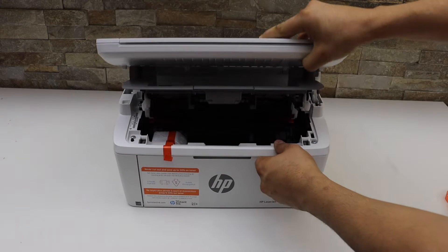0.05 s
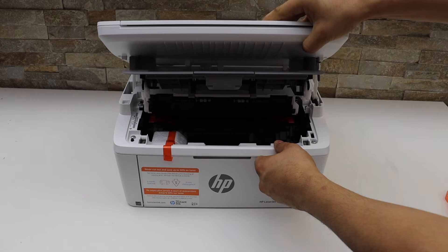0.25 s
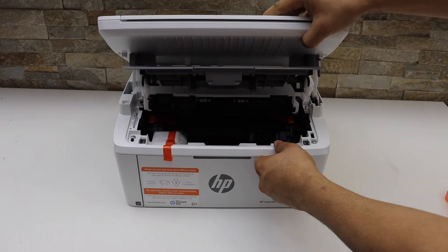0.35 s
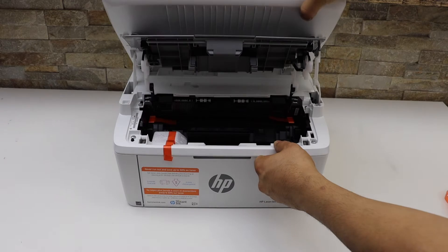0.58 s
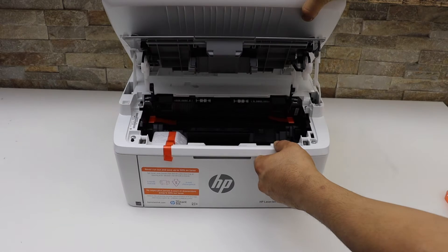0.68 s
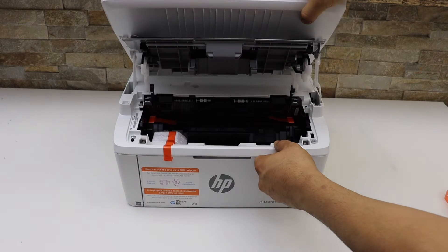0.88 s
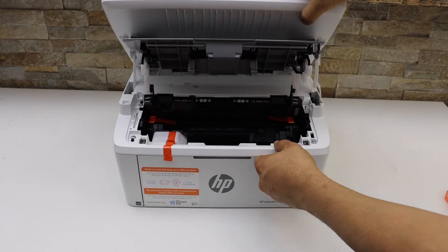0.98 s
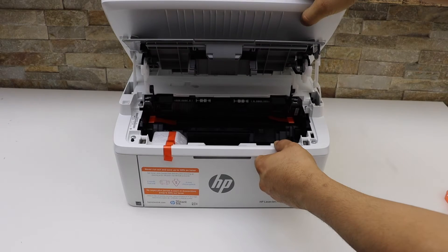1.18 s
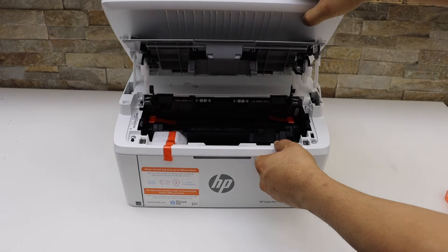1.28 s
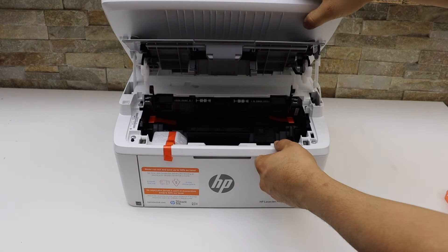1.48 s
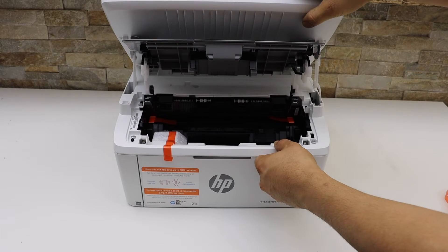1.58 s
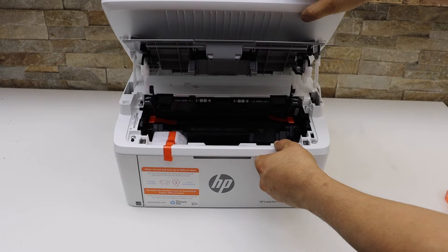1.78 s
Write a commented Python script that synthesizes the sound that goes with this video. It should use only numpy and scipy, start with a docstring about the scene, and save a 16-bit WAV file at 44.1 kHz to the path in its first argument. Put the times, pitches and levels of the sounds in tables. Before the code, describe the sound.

A small printer's plastic lid clacks as a hand lifts it. The latch snaps free, the hinge clacks over, and the lid hits its stop with a brief scrape and thump. Faint ticks follow, close by in a quiet room.

```python
"""The plastic lid of a small printer clacks as a hand lifts it in a quiet room.
The latch snaps free and rebounds, the hinge link clacks over, and the lid hits its stop, scrapes and
settles with a thump. Each impact excites a dense burst of panel modes and a few clear, damped ones.
Sliding plastic rasps by stick-slip friction; the walls add a short reverberation over steady air."""
import sys
import numpy as np
from scipy import signal
from scipy.fft import rfft, irfft, next_fast_len
from scipy.io import wavfile
from scipy.ndimage import uniform_filter1d, map_coordinates

SR = 44100
rng = np.random.default_rng(int(sys.argv[2]) if len(sys.argv) > 2 else 0)


def put_to_file(sound):
    """Save the sound as 16-bit audio at rate SR, in the file named by the first command-line argument."""
    columns = np.atleast_2d(sound).T  # one column per channel
    safe = np.clip(columns, -1, 1)
    whole_steps = np.round(safe * 32767)
    wavfile.write(sys.argv[1], SR, whole_steps.astype(np.int16))


N = 81585

# impacts of lid and hinge: t/s, rise/s, T60/s, lowest f/Hz, level/dB at each of CLACK_HZ
CLACKS = [(0.0, 0.00092, 0.034, 140, -41.5, -38.5, -35, -39),
          (0.2225, 0.0028, 0.022, 149, -37, -30, -14.5, -10.5),
          (0.225, 0.00032, 0.059, 210, -22.5, -17.5, -11, -30),
          (.262, 0.0041, 0.043, 298, -24, -20, -17, -25.5),
          (0.2714, 0.00088, 0.022, 297, -32, -20, -20.5, -18),
          (0.4394, .0006, 0.012, 150, -36.5, -25.5, -15.5, -10.5),
          (0.4414, 0.0018, 0.05, 162, -27.5, -18.5, -15, -18),
          (.557, 0.0056, 0.087, 136, -30, -22.5, -18.5, -22.5),
          (.637, 0.00031, 0.015, 136.8, -25.5, -16.5, -13.5, -13),
          (0.6392, 0.0013, .055, 140, -24.5, -17.5, -16.5, -21),
          (0.725, 0.00081, 0.021, 201, -39.5, -26.5, -40, -42),
          (0.738, 0.00096, 0.041, 185, -30.5, -34, -30.5, -30)]
# ticks of loose plastic: t/s, T60/s, level/dB at each of TICK_HZ
TICKS = [(.027, .03, -59, -62, -48), (.079, 0.11, -40, -60, -56), (.193, 0.16, -50, -51.5, -48.5),
         (0.8438, 0.024, -59, -59, -34), (.888, 0.079, -55, -44, -70), (.932, 0.058, -65, -48.5, -60.5),
         (1.105, 0.076, -46, -64, -71), (1.214, 0.033, -63, -47.5, -46.5)]
# resonances of the loose plastic: f/Hz, level/dB
TICK_PEAKS = [(1150, -4.5), (2000, -7.5), (3000, -4.5), (3800, 0), (6000, -9)]
# panel response common to all impacts: f/Hz, gain/dB
PANEL = [(60, -11.5), (170, -6), (330, 1), (600, 1), (850, 0.5), (1100, 1), (2000, 0.5), (3000, -3.5),
         (3600, -4), (4300, -2.5), (5800, -4), (7500, -2), (9000, -3.5), (10700, -1.5), (12300, -8),
         (13500, -4.5), (15500, -17.5)]
# normal modes of each struck part: f/Hz, level/dB, T60/s
LATCH_MODES = [(242, -31, .12), (305, -23, .16), (350, -24, .1), (470, -21, .07), (517, -14, .075),
               (567, -15, .06), (860, -27, .08), (1055, -18, .075), (1290, -22, .06), (1830, -25, .1),
               (1955, -12.5, .055), (2120, -20, .04), (2405, -19, .07), (2555, -23, .06), (3650, -22, .035)]
REBOUND_MODES = [(295, -24, .16), (620, -24, .08), (1225, -20, .09), (1615, -24, .08)]
LINK_MODES = [(165, -32, .15), (220, -34, .1), (435, -26, .08), (710, -23, .05), (1062, -12, .055),
              (1315, -18, .07), (3600, -23, .03), (5185, -22, .035), (7040, -22, .04)]
HINGE_MODES = [(160, -30, .17), (315, -27, .13), (402, -23, .13), (597, -27, .11), (1480, -28, .07),
               (11200, -28, .03)]
STOP_MODES = [(190, -29, .1), (318, -27, .22), (365, -18, .09), (398, -19, .1), (690, -15, .06),
              (1010, -17, .055), (1105, -20, .08), (1525, -17, .06), (2245, -23, .055), (2720, -22, .04)]
LID_MODES = [(62, -39, .3), (88, -26, .14), (180, -27, .22), (241, -32, .35), (399, -29, .35)]
STAY_MODES = [(175, -28, .14), (1320, -34, .2), (1588, -37, .2), (1890, -28, .16)]
CATCH_MODES = [(9000, -35, .006), (12800, -28, .008), (13700, -24, .012)]
# envelopes of the sliding hinge and the rubbing lid: t/s, level/dB
SLIDE_ENVELOPE = [(.655, -33.5), (.673, -21), (.686, -17.5), (.70, -26.5), (.73, -31.5), (.78, -62)]
RUB_ENVELOPE = [(0, -31.5), (.06, -43.5), (.12, -43), (.2, -49), (.55, -56), (.8, -60.5), (.95, -57)]
# their friction spectra: f/Hz, relative band level/dB
SLIDE_SPECTRUM = [(40, -26), (90, -9.5), (200, -7), (600, -9.5), (1400, -1.5), (3000, -1.5), (8000, 2.5),
                  (11000, 0.5), (15500, -24)]
RUB_SPECTRUM = [(50, -26), (100, -14), (170, 2.5), (280, -13), (400, -6), (1200, -0.5), (4000, -5.5),
                (12000, -6.5), (15500, -22.5)]
# reverberation of the room: f/Hz, tail energy/dB, T60/s
ROOM = [(60, -8.5, .4), (180, -2.5, 0.34), (400, -2.5, 0.39), (1200, -6.5, 0.42), (3000, -10, 0.43),
        (7000, -11.5, 0.33), (13780, -17, .27)]
# steady air of the room: f/Hz, band level/dB
AIR_SPECTRUM = [(25, -72), (60, -69), (90, -70), (125, -57.5), (250, -57.5), (600, -57.5), (1200, -60),
                (2500, -64.5), (5000, -68), (8000, -72.5), (12000, -69.5), (15500, -89)]
# when each part is struck: t/s, modes
PARTS = [(.225, LATCH_MODES), (.266, REBOUND_MODES), (.441, LINK_MODES), (.563, HINGE_MODES),
         (.6372, STOP_MODES), (.68, LID_MODES), (.732, STAY_MODES), (.69, CATCH_MODES)]

CLACK_HZ, TICK_HZ = (400, 1400, 4000, 10000), (300, 1990, 11970)
TICK_RISE_S, TICK_LOWEST_HZ = .0006, 118
BANDS_HZ = 31.25 * 2 ** (np.arange(19) / 2)
PLUS_MINUS = np.array([[1], [-1]])


def lid_impacts(resonance):
    """Impact excitation: parts clack and tick; resonance (0-1) sets how much their modes colour it."""
    out = np.zeros((2, N))
    for start, rise, t60, lowest_hz, *levels in CLACKS:
        _, modes = min(PARTS, key=lambda part: abs(part[0] - start))
        spectrum = list(zip(CLACK_HZ, levels))
        add(out, start, panel_burst(rise, t60, lowest_hz, spectrum, modes, resonance))
    for start, t60, *levels in TICKS:
        spectrum = list(zip(TICK_HZ, levels))
        add(out, start, panel_burst(TICK_RISE_S, t60, TICK_LOWEST_HZ, spectrum, TICK_PEAKS, resonance))
    return out


def panel_burst(rise_s, t60, lowest_hz, spectrum, modes, resonance,
                hold_s=.0024, smooth_hz=150, shelf_db=-12.5, size=8192):
    """Modal overlap: crowded panel modes merge into decaying noise, weak below the lowest mode."""
    t = np.arange(size) / SR
    hz = np.maximum(np.arange(size // 2 + 1) * SR / size, BANDS_HZ[0])
    envelope = np.minimum(t / rise_s, 1) * fade(t - rise_s - hold_s, t60)
    burst = rfft(envelope * rng.standard_normal((2, size)))
    power = uniform_filter1d(abs(burst) ** 2, int(smooth_hz * size / SR), axis=1)
    ripple = np.sqrt(power / np.sum(envelope ** 2))  # chance peaks of the noise, divided out below
    bass_db = shelf_db / (1 + (hz / lowest_hz) ** 8)
    gain = undb(at(hz, PANEL) + at(hz, spectrum) + bass_db + resonance * resonance_db(hz, modes))
    gain *= np.sqrt(SR / (np.maximum(hz, lowest_hz) * np.log(2)))  # octave level to spectral density
    width = np.sqrt((1 + PLUS_MINUS * direct_coherence(hz)) / 2)
    mid, side = irfft(burst * minimum_phase(gain * width / ripple))
    return np.array([mid + side, mid - side])


def resonance_db(hz, modes, peak_db=10.5, valley_db=-4.5, valley_top_hz=4500):
    """Resonance: the response peaks around a part's main modes and sinks between them."""
    centre_hz, db = np.array(modes, float).T[:2, :, None]
    width_hz = 45 + .03 * centre_hz
    peaks = undb((db - db.max()) / 2) / (1 + ((hz - centre_hz) / width_hz) ** 4)
    return peak_db * peaks.max(axis=0) + valley_db / (1 + (hz / valley_top_hz) ** 2)


def ringing_parts(gain_db=-1):
    """Free vibration: each struck part rings as a sum of exponentially damped normal modes."""
    out, t = np.zeros((2, N)), np.arange(N) / SR
    for start, modes in PARTS:
        for hz, db, t60 in modes:
            # higher modes reach the two channels further out of phase
            skew = rng.choice([-1, 1]) * np.arccos(direct_coherence(hz)) / 2
            phase = rng.uniform(0, 2 * np.pi) + PLUS_MINUS * skew
            onset = np.sin(np.pi / 2 * np.minimum(t * hz / 2, 1))  # two cycles long
            envelope = undb(db + gain_db) * onset * fade(t, t60)
            add(out, start, envelope * np.sin(2 * np.pi * hz * t + phase))
    return out


def friction(envelope, spectrum, slips_per_s=1200, slip_s=.002, spread_db=3):
    """Stick-slip friction: sliding plastic releases energy in tiny, uneven bursts of noise."""
    t = np.arange(N) / SR
    slips = (rng.random(N) < slips_per_s / SR) * undb(spread_db * rng.standard_normal(N))
    slip_energy = signal.lfilter([1], [1, -np.exp(-1 / (slip_s * SR))], slips ** 2)
    rasp = np.sqrt(slip_energy) * steady_noise(spectrum, direct_coherence)
    times, db = np.array(envelope).T
    return rasp / rasp.std() * undb(np.interp(t, times, db, left=-np.inf, right=-np.inf))


def reverberation(sound, delay_s=.0088, build_s=.017, wide_hz=810, size=32768):
    """Diffuse field: wall reflections build up and decay by band, coherent only in the bass."""
    t, response = np.arange(size) / SR, 0
    for hz in BANDS_HZ:
        envelope = np.clip((t - delay_s) / build_s, 0, 1) * fade(t, at(hz, ROOM, column=2))
        tail = envelope * band_noise(hz, 1 / (1 + (hz / wide_hz) ** 2), size)
        band_share = hz * np.log(2) / SR
        response += tail * np.sqrt(2 * band_share / np.sum(tail ** 2)) * undb(at(hz, ROOM))
    return signal.fftconvolve(sound, response, axes=1)[:, :N]


def room_air(wide_hz=2500):
    """Ambient noise: a steady hush whose coherence between channels falls with frequency."""
    return steady_noise(AIR_SPECTRUM, lambda hz: 1 / (1 + hz / wide_hz))


def direct_coherence(hz, floor=.23, wide_hz=2000):
    """Coherence of a close source: the channels are alike in the bass, less so higher up."""
    return np.clip(floor + (1 - floor) / (1 + (hz / wide_hz) ** 2), 0, .995)


def steady_noise(spectrum, coherence):
    """Incoherent addition: independent noise bands sum to a broad spectrum."""
    size = next_fast_len(N)
    return sum(undb(at(hz, spectrum)) * band_noise(hz, coherence(hz), size)[:, :N] for hz in BANDS_HZ)


def band_noise(hz, coherence, size):
    """Partial coherence: common and opposed noise mix into a half-octave stereo band of unit rms."""
    half_octaves = 2 * np.log2(np.maximum(np.arange(size // 2 + 1) * SR / size, 1) / hz)
    passband = np.cos(np.pi / 2 * np.clip(half_octaves, -1, 1))
    mid, side = irfft(rfft(rng.standard_normal((2, size))) * passband, size)
    common = mid / mid.std() * np.sqrt(1 + coherence)
    opposed = side / side.std() * np.sqrt(1 - coherence)
    return (common + PLUS_MINUS * opposed) / np.sqrt(2)


def minimum_phase(gain):
    """Causality: folding the cepstrum gives the minimum-phase response with these gains."""
    cepstrum = irfft(np.log(gain + 1e-9))
    half = cepstrum.shape[-1] // 2
    cepstrum[..., 1:half] *= 2
    cepstrum[..., half + 1:] = 0
    return np.exp(rfft(cepstrum))


def fade(t, t60):
    """Exponential damping: 60 dB in t60 seconds, from time zero."""
    return np.exp(-np.log(1000) * np.maximum(t, 0) / t60)


def undb(db):
    """Amplitude ratio of a level in decibels."""
    return 10 ** (np.asarray(db) / 20)


def at(hz, table, column=1):
    """Interpolation of a table column over log frequency."""
    rows = np.array(table, float)
    return np.interp(np.log(hz), np.log(rows[:, 0]), rows[:, column])


def add(out, start_s, sound):
    """Superposition of a sound from a given time."""
    i = int(start_s * SR)
    out[:, i:i + sound.shape[-1]] += sound[..., :N - i]


def scene(left_lag_s=.00003, pan_db=-.4, ring_send_db=-6):
    """Superposition of the printer's direct sound, its reverberant field and the room's air."""
    scrapes = friction(SLIDE_ENVELOPE, SLIDE_SPECTRUM) + friction(RUB_ENVELOPE, RUB_SPECTRUM)
    rings = ringing_parts()
    left, right = lid_impacts(resonance=1) + scrapes + rings
    # a later, weaker left channel places the printer a little to the right
    left = map_coordinates(left, [np.arange(N) - left_lag_s * SR])
    direct = np.array([left, right]) * undb(PLUS_MINUS * pan_db / 2)
    # radiation from all sides feeds the room, so it is less coloured
    radiated = lid_impacts(resonance=.3) + scrapes + undb(ring_send_db) * rings
    return direct + reverberation(radiated) + room_air()


def record(dry, low_cut_hz=42, top_hz=15850):
    """Band limiting: a high-pass, clipping at full scale, then a steep low-pass."""
    thinned = signal.sosfilt(signal.butter(2, low_cut_hz, "high", fs=SR, output="sos"), dry)
    low_pass = signal.ellip(10, .2, 85, top_hz, fs=SR, output="sos")
    return signal.sosfilt(low_pass, np.clip(thinned, -1, 1))


dry = scene()
out = record(dry)
put_to_file(out)
```